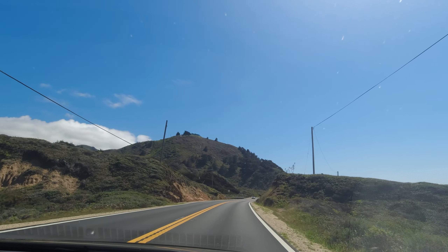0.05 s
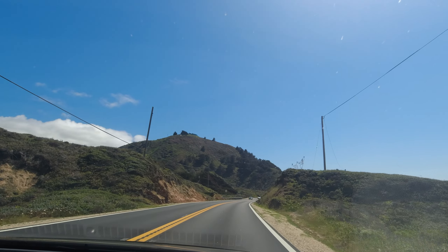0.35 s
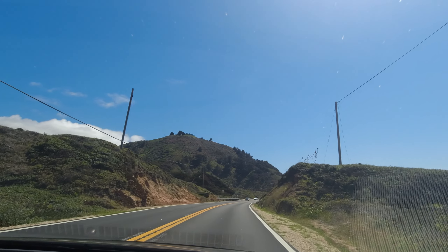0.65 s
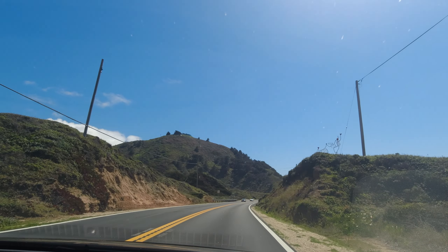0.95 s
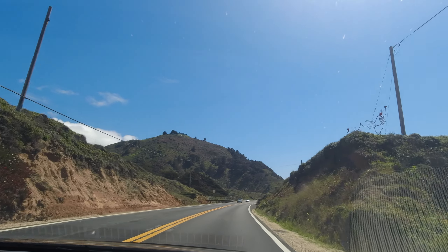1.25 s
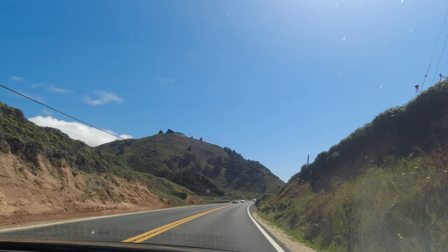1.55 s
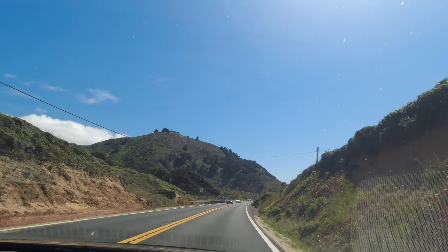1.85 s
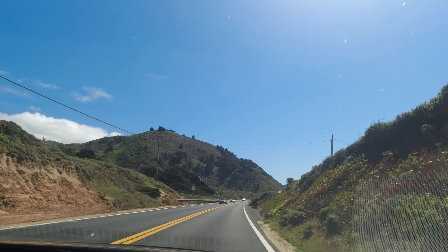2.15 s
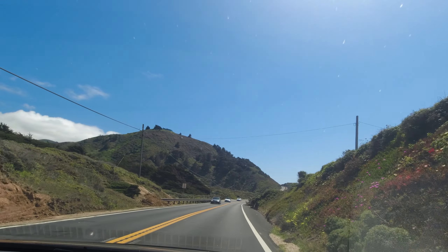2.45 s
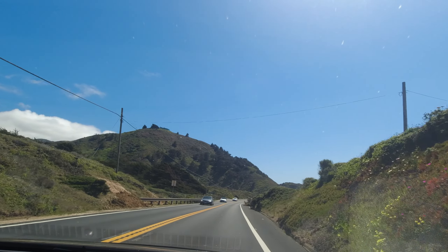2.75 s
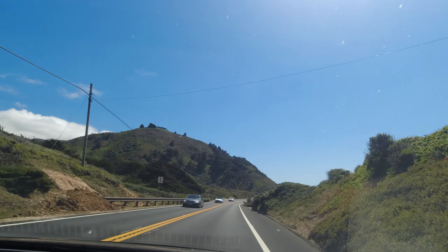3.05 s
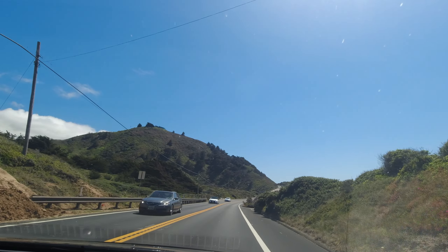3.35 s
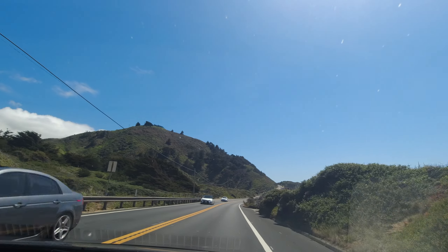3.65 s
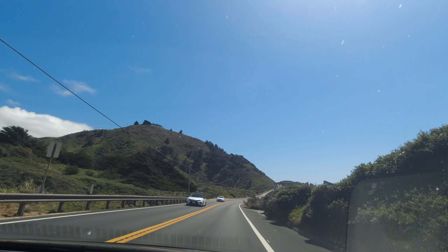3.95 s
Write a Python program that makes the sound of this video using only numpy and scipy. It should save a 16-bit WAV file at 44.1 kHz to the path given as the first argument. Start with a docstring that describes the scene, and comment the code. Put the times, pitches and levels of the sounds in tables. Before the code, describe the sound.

Tyres rumble steadily inside a closed car on an open road, over a buried engine note and faint wind. Uneven asphalt brings clusters of deep thuds, with faint trim rattles early and the strongest booms near the end.

```python
"""Inside a closed car on an open road: tyres rumble through the body under a faint rush of wind,
with the engine's low note buried beneath them. Uneven asphalt jolts the body in clusters of deep
thuds, and the harder ones make the cabin air boom. Trim buzzes and rattles faintly over the bumps,
and something small ticks once near the end."""
import sys
import numpy as np
from scipy import signal
from scipy.fft import rfft, irfft
from scipy.io import wavfile

SR = 44100
rng = np.random.default_rng(int(sys.argv[2]) if len(sys.argv) > 2 else 0)


def store_pcm(level_fs):
    """Save levels as 16-bit WAV."""
    pcm = np.round(np.clip(level_fs, -1, 1) * 32767).astype(np.int16)
    wavfile.write(sys.argv[1], SR, np.atleast_2d(pcm).T)


N = 176400
T = np.arange(N) / SR

# stereo image of the road noise: f/Hz, left-right likeness (-1 to 1)
ROAD_LIKENESS = [(50, 0.98), (200, 1), (360, 0.99), (640, 0.97), (1200, 1)]
# stereo image of wind, tick and hiss: f/Hz, left-right likeness (-1 to 1)
AIR_LIKENESS = [(600, 0.99), (1270, .75), (2100, 0.2), (2800, .1), (3800, -0.66), (6000, 0.22),
                (11000, .45)]


def amp(db):
    """Decibels to gain."""
    return 10 ** (np.asarray(db) / 20)


def unit(x):
    """Scales to rms 1."""
    return x / np.sqrt(np.mean(x ** 2) + 1e-20)


def curve_at(points, hz):
    """Reads a curve on a log-frequency axis."""
    f, value = np.transpose(points)
    return np.interp(np.log(hz + 1), np.log(f + 1), value)


def noise(colour, likeness):
    """Stereo noise of rms 1 with a given colour and left-right likeness."""
    hz = np.fft.rfftfreq(N, 1 / SR)
    mid, side = rfft(rng.standard_normal((2, N)))
    same = np.clip(curve_at(likeness, hz), -.999, .999)
    mid, side = mid * np.sqrt(1 + same), side * np.sqrt(1 - same)
    return unit(irfft(np.array([mid + side, mid - side]) * amp(curve_at(colour, hz)), N))


def wander(width_hz):
    """Smooth random motion of rms 1."""
    hz = np.fft.rfftfreq(N, 1 / SR)
    return unit(irfft(rfft(rng.standard_normal(N)) * np.exp(-(hz / width_hz) ** 2), N))


def ring(hz, width_hz):
    """A resonance shaken at random: a band of noise around one pitch."""
    phase = 2 * np.pi * hz * T
    return wander(width_hz) * np.cos(phase) + wander(width_hz) * np.sin(phase)


def arch(start, length, edge=0.61):
    """A smooth swell and fall; edge is the share of the length spent on the slopes."""
    progress = np.clip((T - start) / length, 0, 1)
    ramp = np.minimum(2 * np.minimum(progress, 1 - progress) / edge, 1)
    return np.sin(np.pi / 2 * ramp) ** 2


def cabin(x, count=40, echo_db=-12, t60_s=0.12, span_s=0.07):
    """Short reflections off glass and dashboard comb the sound into narrow resonances."""
    hz = np.fft.rfftfreq(N, 1 / SR)
    delay_s = rng.uniform(0.003015, span_s, count)
    gains = rng.choice([-1., 1.], count) * amp(-60 * delay_s / t60_s)
    taps = np.zeros(N)
    taps[(delay_s * SR).astype(int)] = gains / np.linalg.norm(gains)
    wet = amp(echo_db) * hz / (hz + 350)  # the bass stays nearly dry
    return irfft(rfft(x) * (1 + wet * rfft(taps)) / np.sqrt(1 + wet ** 2), N)


def wind(level_db=-66.5, gust_db=0.74, gust_hz=8):
    """Air around the body: a dull rush through the glass that swells and eases."""
    # colour of the rush: f/Hz, relative level/dB
    colour = [(200, -7), (600, 0), (1080, -2.5), (1190, -0.5), (1265, 8), (1350, -1.5), (1520, -3.5),
              (1700, -2.5), (2200, -9.5), (2650, -14), (2770, -9.5), (2920, -11.5), (3050, -16.5),
              (3900, -12.5), (4600, -25), (6500, -38.5), (14000, -61)]
    # its slow swells: t/s, relative level/dB
    swells = [(0, 1), (.7, 0.4), (.9, -2), (1.1, 0.6), (1.64, -1), (1.72, 1), (1.8, 0.5), (2.3, -0.5),
              (3.0, -0.3), (3.2, 1), (3.66, 1.9), (3.8, 1), (4, -1.3)]
    rush = noise(colour, AIR_LIKENESS)
    return rush * amp(level_db + np.interp(T, *np.transpose(swells)) + gust_db * wander(gust_hz))


def engine(firing_hz=47.2, level_db=-46.5, drift=0.078, drift_hz=9):
    """A low, wavering firing note at cruising speed."""
    hz = firing_hz * (1 + drift * wander(drift_hz))
    return amp(level_db) * np.sin(2 * np.pi * np.cumsum(hz) / SR)


def trim_rattle(clicks_per_s=1800):
    """Loose trim chatters in tiny clicks while the body shakes."""
    # bursts of chatter: t/s, level/dB, length/s
    bursts = [(0.083, -83, 0.2), (.37, -80.5, 0.14), (0.861, -77.5, .1), (2.357, -85, 0.091)]
    # colour of the clicks: f/Hz, relative level/dB
    colour = [(600, -25), (1500, 0), (2200, -2), (3000, -7), (3900, -7), (5000, -22), (9000, -45)]
    clicks = rng.standard_normal((2, N)) * (rng.random(N) < clicks_per_s / SR)
    clicks = clicks + clicks.mean(0)  # narrows the image
    hz = np.fft.rfftfreq(N, 1 / SR)
    rasp = unit(irfft(rfft(clicks) * amp(curve_at(colour, hz)), N))
    return rasp * sum(amp(db) * arch(start, length) for start, db, length in bursts)


def trim_buzz():
    """A panel sings briefly when shaken."""
    # buzzes: t/s, level/dB, length/s
    buzzes = [(0.13, -63, 0.039), (0.44, -62.5, 0.071)]
    envelope = sum(amp(db) * arch(start, length) for start, db, length in buzzes)
    return envelope * ring(hz=1246, width_hz=95)


def tick(at_s=3.5135, width_s=0.002, note_hz=3570, note_db=-60, tap_db=-58.5, tail_db=-75, t60_s=0.36):
    """One soft plastic tick: a quickly damped note over a dull tap, then a faint uneven ring."""
    # colour of the tap: f/Hz, relative level/dB
    colour = [(500, -8), (1200, 0), (2000, -9), (2700, -20), (3500, -12), (4500, -21), (7000, -45)]
    t = T - at_s
    strike = np.exp(-(t / width_s) ** 2)
    note = amp(note_db) * np.sin(2 * np.pi * note_hz * t)
    tail = (t > 0) * amp(tail_db - 60 * abs(t) / t60_s) * ring(note_hz, width_hz=380)
    tap = amp(tap_db) * noise(colour, AIR_LIKENESS)
    return strike * (note + tap) + tail


def tyre_rumble(level_db=-38):
    """Rolling tyres lay a deep bed that follows the roughness of the asphalt."""
    # colour of the rumble inside the car: f/Hz, relative level/dB
    colour = [(8, -15), (22, -0.5), (45, -2), (68, -0.5), (88, -2.5), (114, 2.85), (131, -3.5), (153, -1),
              (172, -4.5), (197, -2), (222, -8.5), (246, -4.5), (272, -9.5), (288, -8), (328, -9),
              (365, -17), (410, -16), (455, -11), (485, -16.5), (515, -24.5), (555, -18.5), (660, -25.5),
              (730, -20), (800, -27.5), (845, -24), (890, -29.5), (1080, -40), (1600, -52.5), (3000, -86.5)]
    # roughness of the asphalt: t/s, relative level/dB
    roughness = [(0, 1), (.45, 1.5), (.6, 1), (1.0, 1), (1.4, -1), (1.9, -0.5), (2.4, 0), (2.8, 0),
                 (3.12, 0), (3.24, 1), (3.45, 1), (3.65, 2), (4, 2.5)]
    return noise(colour, ROAD_LIKENESS) * amp(level_db + np.interp(T, *np.transpose(roughness)))


def tyre_roar(relative_width=0.27):
    """Coarse patches briefly swell the tyres, each in its own register."""
    # coarse patches: t/s, level/dB, length/s, centre f/Hz
    patches = [(0.005, -46, 0.09, 310), (0.28, -53.5, 0.036, 490), (0.319, -43, 0.097, 330),
               (.425, -45, 0.13, 290), (.435, -50.5, 0.1, 480), (0.93, -48.5, 0.075, 450),
               (2.272, -59, 0.19, 760), (2.52, -48.5, 0.22, 310), (3.606, -54.5, 0.088, 550),
               (3.808, -43, 0.077, 290), (3.835, -50.5, 0.15, 490)]
    return sum(amp(db) * arch(start, length) * ring(hz, relative_width * hz)
               for start, db, length, hz in patches)


def cabin_booms(attack_s=0.0092, sag=0.11, roughness=0.33):
    """The cabin air rings roughly after a hard bump, sagging in pitch as it dies; the row at 1.606 s is instead
    a brief knock on its own."""
    # booms: t/s, level/dB, length/s, mean f/Hz
    booms = [(.28, -30.5, 0.14, 105.8), (0.791, -24.5, 0.12, 113.6), (.905, -33, 0.064, 192),
             (.935, -29.5, 0.06, 157), (0.989, -33, 0.11, 83.2), (1.606, -30, 0.0072, 260),
             (2.42, -33, 0.042, 106.6), (3.18, -32, 0.068, 180), (3.224, -33, 0.11, 101.1),
             (3.628, -24, 0.047, 162.3), (3.646, -27, 0.069, 84), (3.68, -29, 0.077, 187),
             (3.732, -27, .06, 99), (3.803, -17.5, 0.044, 157.1), (3.836, -19.5, 0.066, 121.9),
             (3.875, -28, 0.076, 192), (3.93, -25, 0.073, 97.1), (3.959, -31.5, 0.054, 223.6)]
    out = np.zeros(N)
    for start, db, length, hz in booms:
        t = np.clip(T - start, 0, length)
        attack = np.sin(np.pi / 2 * np.minimum(t / attack_s, 1)) ** 2
        fade = np.cos(np.pi / 2 * t / length)
        tone = np.sin(2 * np.pi * hz * t * (1 + sag * (1 - t / length) / 2))
        out += amp(db) * attack * fade * (tone + roughness * ring(hz, width_hz=99))
    return out


def body_jolts(shudder_relative_db=-25.5):
    """Each bump swings the body for a few cycles, a deep thud, and sets the panels shuddering."""
    # bumps: t/s, level/dB, length/s, f/Hz
    bumps = [(0.137, -19.5, 0.04, 34.6), (0.232, -16, 0.086, 26.8), (0.313, -14.5, 0.043, 32.8),
             (0.353, -28, 0.086, 41.4), (0.414, -17, 0.086, 26.7), (0.775, -19, 0.065, 45),
             (0.831, -19.5, 0.093, 42.6), (0.91, -14, 0.056, 40.5), (0.969, -26, 0.094, 43),
             (2.314, -18.5, 0.056, 34), (2.375, -18.5, 0.052, 29.8), (2.498, -17.5, 0.087, 27.3),
             (2.576, -22.5, 0.067, 28), (3.224, -32, 0.12, 29.4), (3.341, -31, 0.04, 25.8),
             (3.628, -27, 0.056, 35.1), (3.79, -19, 0.063, 39), (3.87, -21, 0.03, 41),
             (3.907, -15.5, 0.043, 40.6), (3.958, -21.5, 0.056, 33.1)]
    # colour of the shudder: f/Hz, relative level/dB
    colour = [(20, -6), (65, -1), (110, -2.5), (200, -4), (320, -13.5), (450, -15.5), (650, -21),
              (900, -30), (1500, -54), (4000, -76.5)]
    swing, force = np.zeros(N), np.zeros(N)
    for start, db, length, hz in bumps:
        push = amp(db) * arch(start, length)
        swing += push * np.sin(2 * np.pi * hz * (T - start))
        force += push
    return swing + force * amp(shudder_relative_db) * noise(colour, ROAD_LIKENESS)


def scene(left_lag_s=0.000077):
    """The mix behind the windscreen; the low end arrives on the right first."""
    left, right = cabin(tyre_rumble() + tyre_roar()) + engine() + body_jolts() + cabin_booms()
    low_end = np.array([np.interp(T - left_lag_s, T, left), right])
    return low_end + cabin(wind()) + trim_buzz() + trim_rattle() + tick()


def record(dry, hiss_db=-85.5, cutoff_hz=12800):
    """Thin microphone hiss, then a steep low-pass."""
    # colour of the hiss: f/Hz, relative level/dB
    colour = [(20, -39), (7000, -26), (9500, -12), (10900, 4.5), (11600, -2), (12200, -6.5), (13000, -17)]
    heard = dry + amp(hiss_db) * noise(colour, AIR_LIKENESS)
    padded = np.pad(heard, ((0, 0), (255, 255)), "reflect", reflect_type="odd")
    low_pass = signal.firwin(511, cutoff_hz, window=("kaiser", 9), fs=SR)
    return signal.oaconvolve(padded, low_pass[None], "valid")


dry = scene()
out = record(dry)
store_pcm(out)
```